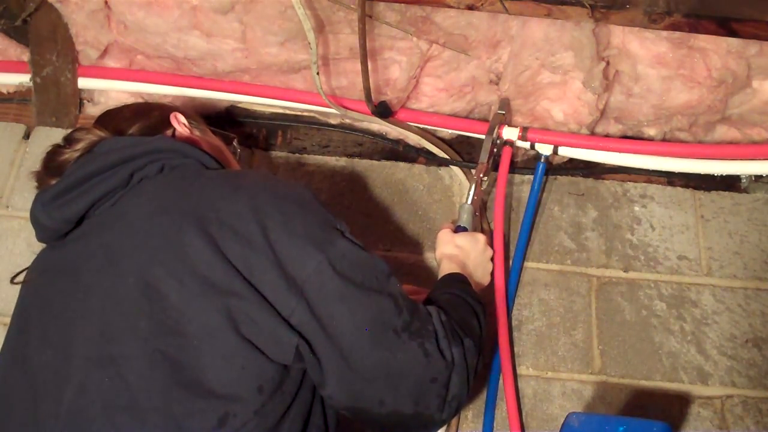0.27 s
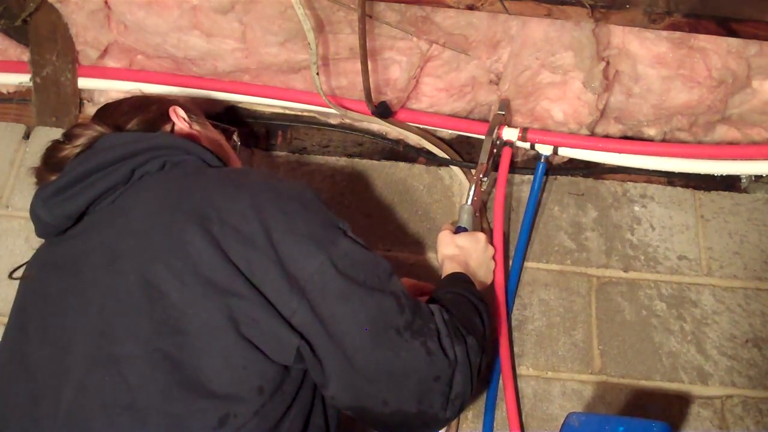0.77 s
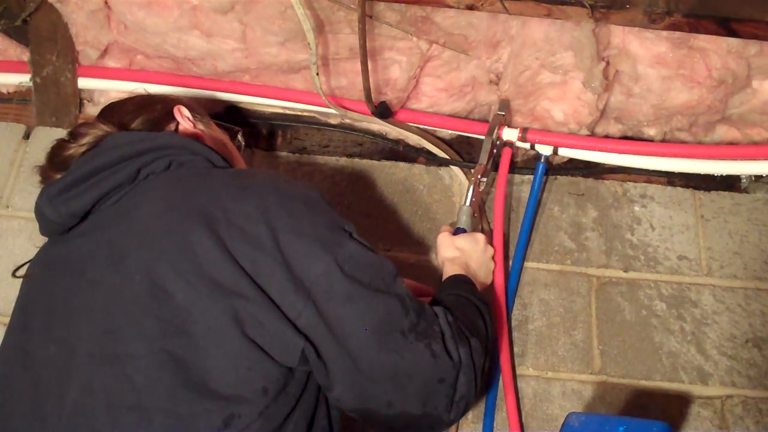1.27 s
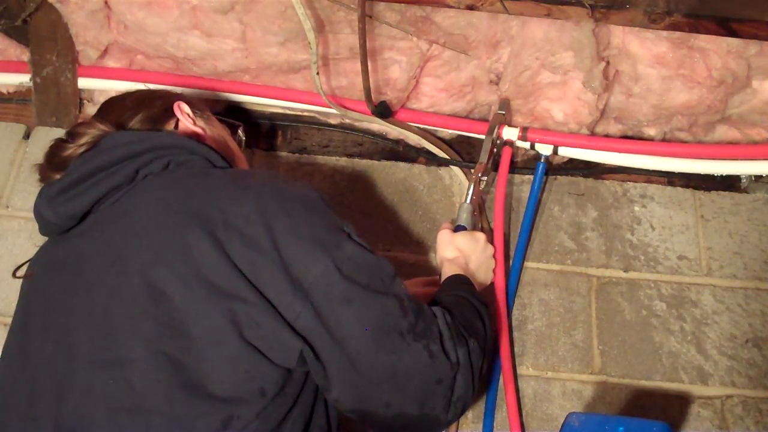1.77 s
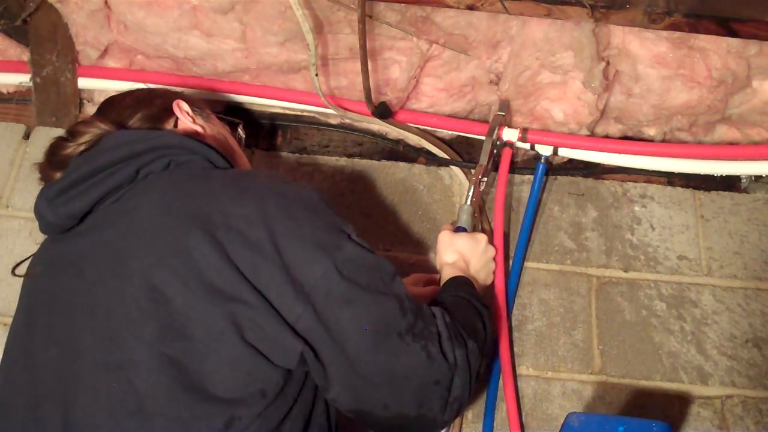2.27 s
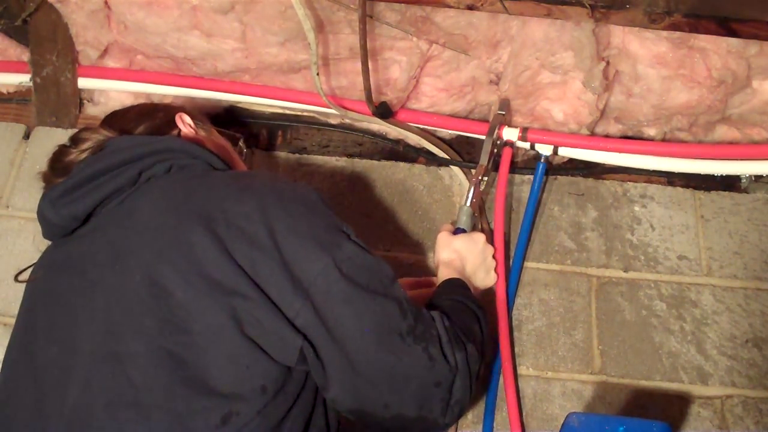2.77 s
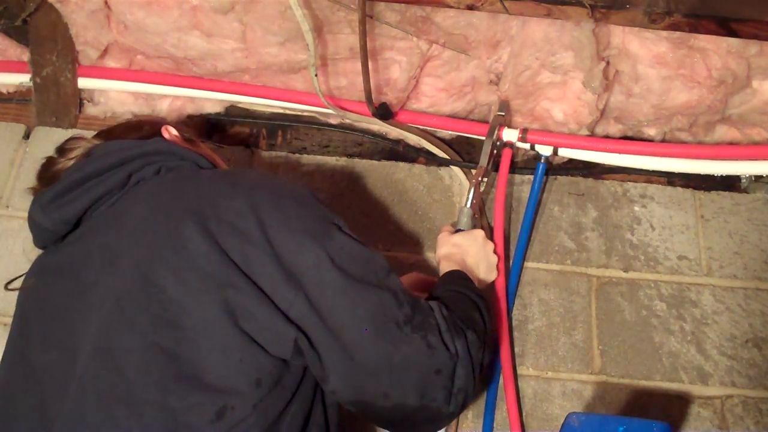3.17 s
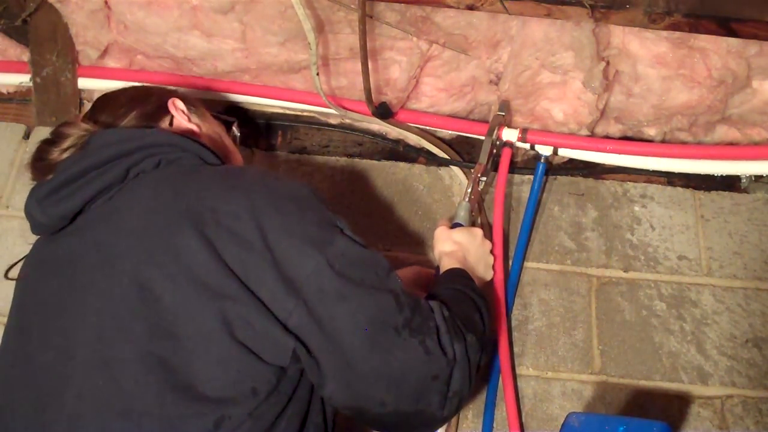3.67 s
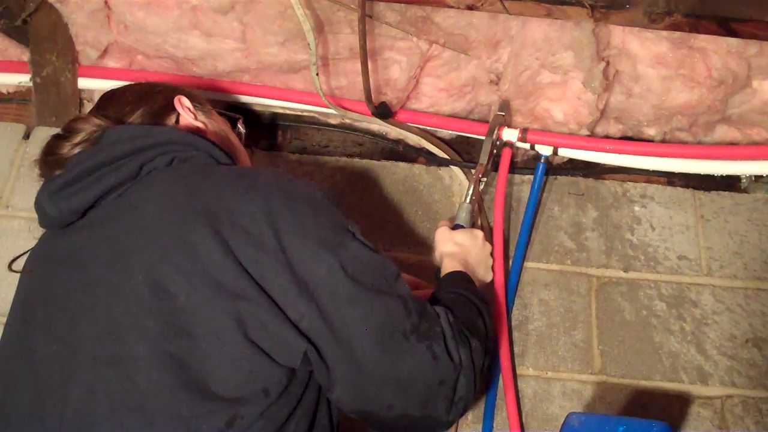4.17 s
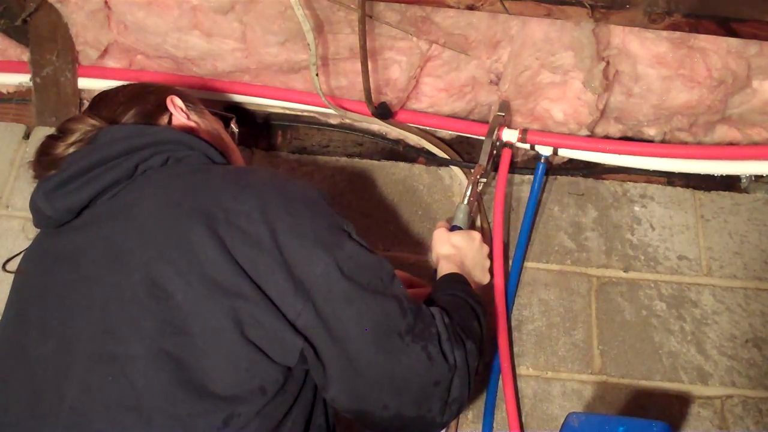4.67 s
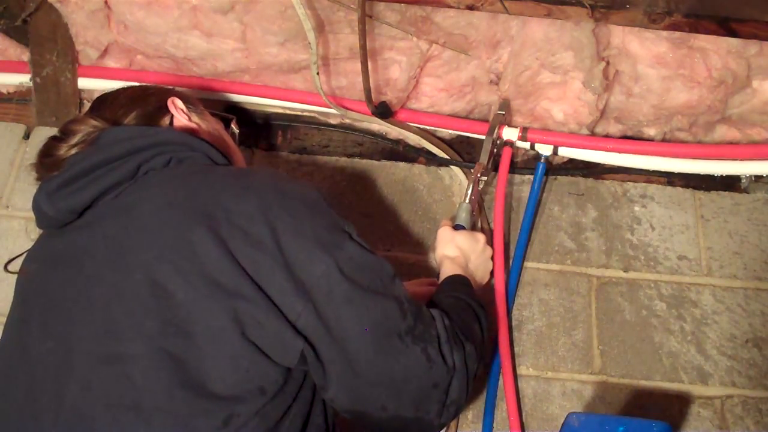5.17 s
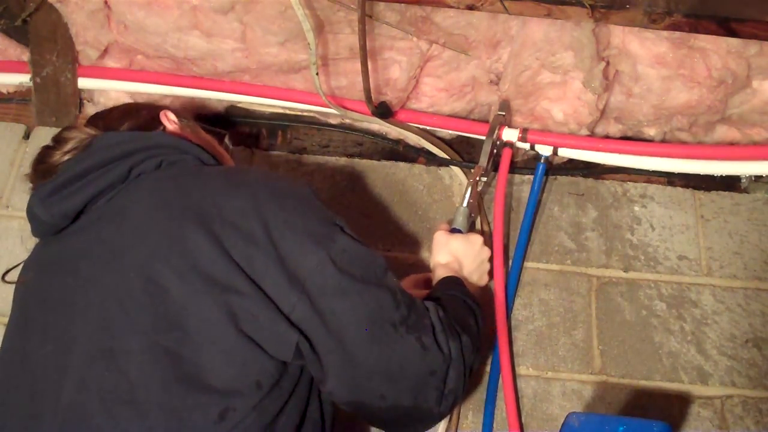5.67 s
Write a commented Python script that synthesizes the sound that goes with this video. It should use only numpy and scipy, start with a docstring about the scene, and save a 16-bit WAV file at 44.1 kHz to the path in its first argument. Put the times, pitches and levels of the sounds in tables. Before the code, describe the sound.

Residual water falls from a drained pipe onto hard plastic. At first there are only faint, irregular ticks and a barely audible fizzing trickle; clear high plinks follow. Four sharp, splashy smacks around 2.5, 3.6, 5.1 and 5.8 seconds overload the close microphone, adding a low thud and hum. Bubbles plop and gurgle softly between them in a tight block-walled space.

```python
"""Water drips from a drained pipe in a low basement, close to the microphone.
Heavy drops smack hard plastic: shaped noise bursts ring its modes, with a dull low thump as the microphone overloads.
Trapped bubbles plink as sines of rising pitch; small drops tick as bubble clusters with froth and spray.
Gurgles, a fizzing trickle and a faint hiss are filtered noise; joists and a block wall give a short, dense echo.
The smacks overload the microphone and knock its bias down."""
import sys
import numpy as np
from scipy import signal
from scipy.fft import rfft, irfft
from scipy.io import wavfile
from scipy.ndimage import uniform_filter1d

SR = 44100
rng = np.random.default_rng(int(sys.argv[2]) if len(sys.argv) > 2 else 0)


def pcm_store(signal):
    """Save signal as 16-bit PCM."""
    levels = np.round(np.clip(np.atleast_2d(signal), -1, 1) * 32767)
    wavfile.write(sys.argv[1], SR, levels.astype(np.int16).T)


N = 260631
EVENT_S = np.arange(SR // 5) / SR  # time axis of one short sound
EVENT_MS = EVENT_S * 1000


def undb(db):
    """Decibels to gain."""
    return 10 ** (np.asarray(db) / 20)


def add(track, start_s, sound):
    """Mix a sound into the track, cut off at the track's end."""
    start = int(start_s * SR)
    track[start:start + len(sound)] += sound[:N - start]


def unit(x):
    """Scale to rms 1."""
    return x / np.sqrt(np.mean(x ** 2))


def cut(x, hz, kind, order=2):
    """Butterworth low-pass or high-pass."""
    return signal.sosfilt(signal.butter(order, hz, kind, fs=SR, output="sos"), x)


def resonate(x, hz, width_hz):
    """One resonance, gain 1 at its centre."""
    return signal.lfilter(*signal.iirpeak(hz, hz / width_hz, fs=SR), x)


def noise(points, size):
    """Noise of rms 1 whose spectrum follows (hz, db) points, interpolated over log frequency."""
    hz, db = np.transpose(points)
    bins_hz = np.arange(size // 2 + 1) * SR / size
    gain = undb(np.interp(np.log(bins_hz + 1), np.log(hz), db))
    spectrum = rfft(rng.standard_normal(size)) * gain
    return unit(irfft(spectrum, size))


def burst(length_ms, steep, rise_ms=1.2):
    """Envelope with a short soft rise that falls away around length_ms, more abruptly if steep."""
    rise = np.minimum(EVENT_MS / rise_ms, 1)
    return rise * np.exp(-(EVENT_MS / length_ms) ** steep)


def smacks(thump_top_hz=720, crown_db=-8, crown_ms=7, spatter_db=-19, spatter_ms=24, shove=0.63, shove_ms=2.0):
    """Heavy drops burst on plastic, ring its modes and spatter; returns splashes and the overload thumps."""
    # heavy drops: start_s, level_db, splash_ms, splash_low_cut_hz, thump_to_splash_db, thump_low_cut_hz
    smack_events = [(2.528, -36, 6.1, 2000, -26, 250), (2.5323, -14.5, 12.7, 883, -11, 274),
                    (3.592, -33.5, 23, 920, -20, 250), (3.6102, -17, 7.5, 1110, -8.5, 230),
                    (5.118, -30.5, 6.7, 2430, -41, 250), (5.126, -21.5, 3.73, 4600, -21, 110),
                    (5.812, -36, 4.9, 2500, -24, 249), (5.818, -14.5, 12.3, 970, -8.5, 100)]
    # splash spectrum: freq_hz, level_db
    smack_colour = [(300, -7), (1100, -6), (1550, -2), (2400, -6), (4000, -7.5), (6000, -7), (9000, -6),
                    (12500, -11.5), (14500, -22)]
    # resonances of the struck plastic: freq_hz, width_hz, gain_db
    tub_modes = [(821, 120, -1), (1373, 50, -6), (1528, 180, -3.5), (1810, 68, -7.5), (2700, 260, -7),
                 (3920, 350, 9), (4520, 120, -12), (5717, 360, 4.5), (8230, 450, -16.5)]
    splashes, thumps = np.zeros(N), np.zeros(N)
    for start_s, level_db, splash_ms, splash_low_cut_hz, thump_db, thump_low_cut_hz in smack_events:
        push = burst(splash_ms, steep=2.9, rise_ms=0.62)
        size = undb(level_db) * np.sqrt(np.mean(push ** 2))
        crown = undb(crown_db) * burst(crown_ms, steep=0.76, rise_ms=2.2)  # the rim of water breaks up
        spatter = undb(spatter_db) * burst(spatter_ms, steep=1, rise_ms=10)  # and falls back as fine spray
        splash = noise(smack_colour, size=len(EVENT_S)) * (push + crown + spatter)
        ringing = sum(undb(gain_db) * resonate(splash, hz, width_hz) for hz, width_hz, gain_db in tub_modes)
        add(splashes, start_s, size * unit(cut(splash + ringing, splash_low_cut_hz, "high")))

        rumble = cut(rng.standard_normal(len(EVENT_S)) * push, thump_top_hz, "low", order=3)
        rumble = cut(rumble, thump_low_cut_hz, "high")
        sag = -burst(shove_ms, steep=1.0, rise_ms=8.0)  # one slow downward push of the overloaded microphone
        add(thumps, start_s, size * undb(thump_db) * (unit(rumble) + shove * unit(sag)))
    return splashes, thumps


def low_boom(thumps):
    """Low booming resonances that ring after the thumps."""
    # boom resonances: freq_hz, width_hz, gain_db
    boom_modes = [(224, 4.5, -13.5), (341.7, 36, -6), (559, 25, -14.5)]
    return sum(undb(gain_db) * resonate(thumps, hz, width_hz) for hz, width_hz, gain_db in boom_modes)


def bubbles():
    """Trapped bubbles plink, deeper ones fading more slowly; surfacing ones swoop up nearly an octave."""
    # trapped bubbles: start_s, level_db, start_pitch_hz, climb_octaves_per_s
    plinks = [(1.112, -58, 2720, 7.7), (1.163, -29.5, 4270, 8.6), (1.161, -45.5, 2430, 2.5),
              (1.213, -50, 2504, 2), (1.709, -52, 2110, 2), (1.864, -46.5, 2820, 3.3),
              (2.093, -27, 2657, 9.6), (2.095, -25.5, 4364, 2.2), (2.212, -41.5, 4220, 2.4),
              (3.509, -41.5, 2295, 2.2), (3.637, -29.5, 1339, 5.4), (3.924, -45.5, 997, 4.5),
              (4.22, -47, 1153, 3.8), (4.549, -55, 1573, 2), (4.738, -36.5, 1040, 6),
              (4.868, -54.5, 3050, 2), (5.28, -51.5, 685, 7.9), (5.568, -48.5, 1720, 2.2),
              (5.696, -43, 780, 5.3), (5.77, -44, 748, 0.75)]
    # surfacing bubbles: start_s, level_db, start_pitch_hz, octave_climb_ms
    swoops = [(2.271, -59, 930, 34), (2.809, -38.5, 1026, 11), (3.032, -59, 859, 39),
              (5.305, -45.5, 964, 35), (5.726, -44, 990, 22.6)]
    fade_1khz_ms, fade_slope = 13.7, 0.75
    swell_share = 0.28  # build-up / fade
    swoop_peak_share, swoop_fade_ms = 0.56, 7.6  # build-up / octave climb time
    out = np.zeros(N)
    for start_s, level_db, hz, octaves_per_s in plinks:
        fade_ms = fade_1khz_ms / (hz / 1000) ** fade_slope
        add(out, start_s, undb(level_db) * bubble(hz, octaves_per_s, swell_share * fade_ms, fade_ms))
    for start_s, level_db, hz, climb_ms in swoops:
        swoop = bubble(hz, 1000 / climb_ms, swoop_peak_share * climb_ms, swoop_fade_ms)
        add(out, start_s, undb(level_db) * swoop)
    return out


def bubble(hz, octaves_per_s, swell_ms, fade_ms, most_octaves=0.95, wobble_top_hz=200, wobble_rms=0.2):
    """A sine climbs in pitch as the bubble nears the surface; the stirred water makes its level waver."""
    pitch_hz = hz * 2 ** np.minimum(octaves_per_s * EVENT_S, most_octaves)
    swell = np.minimum(EVENT_MS / swell_ms, 1)
    fade = np.exp(-np.maximum(EVENT_MS - swell_ms, 0) / fade_ms)
    wobble = 1 + wobble_rms * unit(cut(rng.standard_normal(len(EVENT_S)), wobble_top_hz, "low"))
    return swell * fade * wobble * np.sin(2 * np.pi * np.cumsum(pitch_hz) / SR)


def drops():
    """Small drops that stand out; the more of a drop goes into spray, the longer the spray lasts."""
    # small drops: start_s, level_db, ring_pitch_hz, spray_to_ring_db
    drop_events = [(0.085, -64.5, 7970, 9), (0.174, -63.5, 7470, -12), (0.249, -71, 7660, 8),
                   (0.312, -67, 7840, 1), (0.34, -69, 10250, -4), (0.377, -59.5, 9040, -12),
                   (0.556, -72, 9660, -23), (0.599, -70.5, 10200, -25), (0.6944, -61, 9640, -6),
                   (0.8408, -62, 5530, -14), (0.909, -67, 6470, 2), (0.988, -67, 3850, -18),
                   (1.0908, -69.5, 8730, -11), (1.139, -66, 8000, 1), (1.1635, -54, 4310, -5.5),
                   (1.2065, -56.5, 7860, -11), (1.297, -70.5, 10760, 0), (1.332, -66, 3280, 4),
                   (1.377, -70, 6330, -2), (1.485, -66, 6700, -1), (1.574, -65.5, 3170, 4),
                   (1.67, -64.5, 2870, 0), (1.7867, -63.5, 3220, 0), (1.8243, -65.5, 11600, -2),
                   (1.863, -61, 2970, -5.5), (2.093, -45, 3315, -8), (2.161, -66.5, 9960, 3),
                   (2.2151, -59, 2430, -12), (2.3363, -68, 5630, 5), (2.795, -65.5, 3540, -4.5),
                   (2.833, -63.5, 5000, 19), (2.899, -70.5, 3400, -1), (2.9653, -63.5, 6100, -5),
                   (3.0625, -59.5, 4780, 24), (3.087, -67, 3100, 0.5), (3.194, -62.5, 4940, -12),
                   (3.273, -66.5, 10600, -14), (3.333, -65.5, 3980, -16), (3.579, -54.5, 3100, -4),
                   (3.714, -59.5, 4270, 3), (3.81, -63.5, 4240, 2), (4.0834, -69.5, 3000, 2.5),
                   (4.21, -69, 5150, 1), (4.221, -66, 2710, -5), (4.29, -69, 5170, -4),
                   (4.393, -68.5, 3680, 3.5), (4.526, -67, 7440, -4), (4.608, -60, 4220, -9),
                   (4.651, -61.5, 7480, -2), (4.673, -64.5, 4800, -6), (4.781, -56.5, 7400, -9.5),
                   (4.807, -60, 6570, 3), (5.092, -58.5, 3740, 5), (5.393, -69, 9100, -1.5),
                   (5.5489, -64.5, 3570, 4.5), (5.697, -65, 8260, 12), (5.7606, -63, 8700, 7)]
    even_spray_ms, doubling_db = 2.6, 16.5  # length at 0 dB spray; dB that double it
    out = np.zeros(N)
    for start_s, level_db, hz, spray_db in drop_events:
        spray_ms = even_spray_ms * 2 ** (spray_db / doubling_db)
        add(out, start_s, undb(level_db) * drop(hz, spray_db, spray_ms))
    return out


def drop(hz, spray_db, spray_ms, ring_ms=2.2, scatter=0.14, stagger_ms=1.3, rise_ms=1.6, froth_db=-1,
         froth_width=0.45, froth_ms=4.3, climb_octaves_per_s=6, count=4):
    """A cluster of tiny bubbles of nearly one size, a froth of still more around their pitch, a broad spray."""
    # spray spectrum: freq_hz, level_db
    spray_colour = [(200, -16.5), (900, -15.5), (2000, -4.5), (4000, 0), (7000, 0.5), (10000, -3.5),
                    (14000, -8.5)]
    ring = np.zeros(len(EVENT_S))
    for k, (detune, turn) in enumerate(rng.uniform(-1, 1, (count, 2))):
        start_hz = min(hz * np.exp(scatter * np.sqrt(k) * detune), SR / 3)
        pitch_hz = start_hz * 2 ** np.minimum(climb_octaves_per_s * EVENT_S, 0.5)
        tone = np.sin(2 * np.pi * np.cumsum(pitch_hz) / SR + np.pi * turn)
        tone = tone * burst(ring_ms, steep=0.81, rise_ms=rise_ms)
        ring += np.roll(tone, int(k * stagger_ms * SR / 1000)) / np.sqrt(1 + k)  # each later and weaker
    froth = churn(hz, froth_width) * burst(froth_ms, steep=0.65, rise_ms=rise_ms)
    spray = cut(noise(spray_colour, size=len(EVENT_S)), hz / 3, "high", order=1)
    spray = spray * burst(spray_ms, steep=0.85, rise_ms=1.6)
    body = unit(unit(ring) + undb(froth_db) * unit(froth))
    return unit(body + undb(spray_db) * unit(spray))


def droplets(count=70, floor_db=-83, spread_db=13, rarity=1.5, low_hz=4300, octaves=1.4, spray_db=-5, spray_ms=5.5):
    """Faint droplets keep landing at uneven gaps; the louder ones are rarer."""
    out = np.zeros(N)
    for k, (when, size, pitch) in enumerate(rng.random((count, 3))):
        start_s = (k + when) / count * N / SR
        level_db = floor_db + spread_db * size ** rarity
        add(out, start_s, undb(level_db) * drop(low_hz * 2 ** (octaves * pitch), spray_db, spray_ms))
    return out


def gurgles(width=1.0):
    """Water gurgles in the pipe: short, hollow churning of water and air."""
    # gurgles: start_s, level_db, pitch_hz, length_ms
    gurgle_events = [(1.323, -64, 364, 16), (2.813, -44, 1410, 4.7), (2.881, -53.5, 1690, 14.5),
                     (3.262, -63, 880, 14), (3.595, -33.5, 1210, 6.4), (3.636, -34, 1365, 17.6),
                     (4.364, -60, 764, 7.5), (4.61, -69, 556, 46), (5.512, -58, 984, 13.5),
                     (5.696, -58.5, 1200, 24)]
    out = np.zeros(N)
    for start_s, level_db, hz, length_ms in gurgle_events:
        gurgle = churn(hz, width) * burst(length_ms, steep=3.4, rise_ms=1.9)
        add(out, start_s, undb(level_db) * gurgle)
    return out


def churn(hz, width):
    """Many unresolved bubbles as noise resonating around one pitch; width is a share of that pitch."""
    width_hz = hz * width
    once = resonate(rng.standard_normal(len(EVENT_S)), hz, width_hz)
    return unit(resonate(once, hz, width_hz))


def trickle(level_db=-81, flicker_db=6.0, step_s=0.03, width=0.86):
    """A thin film of water fizzes along the pipe; each register comes and goes, partly together."""
    t = np.arange(N) / SR
    steps_s = np.arange(600) * step_s
    shared, out = rng.standard_normal(len(steps_s)), np.zeros(N)
    for hz in (3230, 4800, 6750, 9200, 11700):
        own = rng.standard_normal(len(steps_s))
        flicker = np.interp(t, steps_s, (shared + own) / np.sqrt(2))
        fizz = resonate(resonate(rng.standard_normal(N), hz, hz * width), hz, hz * width)
        out += undb(level_db + flicker_db * flicker) * unit(fizz)
    return out


def hiss(level_db=-63.5):
    """Steady background noise, strongest in the lowest bass."""
    # hiss spectrum: freq_hz, level_db (relative)
    hiss_colour = [(12, 7), (20, -6), (30, -12.5), (48, -12), (162, -17), (489, -18), (974, -19),
                   (1280, -23), (1430, -20.5), (7080, -32.5), (8130, -34.5), (13300, -38.5), (14500, -56)]
    return undb(level_db) * noise(hiss_colour, size=N)


def basement(x, near_db, near_t60_s, far_db, far_t60_s):
    """Dense reflections from the joists and wall, then the tail of the room, as decaying noise echoes."""
    # echo spectrum: freq_hz, level_db
    echo_colour = [(100, 9.5), (500, 10.5), (1500, 0), (4000, -4.5), (8000, -3.5), (14000, -6.5)]
    t = np.arange(SR // 2) / SR
    out = x
    for level_db, t60_s, gap_s in ((near_db, near_t60_s, 0.0012), (far_db, far_t60_s, 0.007)):
        decay = np.exp(-np.log(1000) * t / t60_s)
        echo = noise(echo_colour, size=len(t)) * decay * (t > gap_s)
        out = out + undb(level_db) * signal.fftconvolve(x, echo / np.linalg.norm(echo))[:N]
    return out


def scene():
    """All the drips in the room, over its hiss; the microphone's thumps and the low boom after them have no
    echo."""
    splashes, thumps = smacks()
    heavy = basement(splashes, near_db=-9.0, near_t60_s=0.047, far_db=-13.5, far_t60_s=0.23)
    plinks = basement(bubbles(), near_db=-11.0, near_t60_s=0.044, far_db=-18, far_t60_s=0.21)
    small = basement(drops() + droplets() + gurgles(), near_db=-5, near_t60_s=0.091, far_db=-19.5, far_t60_s=0.53)
    return (heavy + thumps + low_boom(thumps) + plinks + small + trickle() + hiss())[None]


def bias_shift(x, edge_hz=8000, threshold=0.019, depth=0.83, drain_per_s=0.19, coupling_hz=2.5, step_hz=118,
               soften_hz=400):
    """Sharp peaks knock the microphone's bias down; it creeps back in small humming steps and overshoots."""
    power = uniform_filter1d(cut(x, edge_hz, "high") ** 2, size=260, origin=129)  # window over the past
    edge = np.sqrt(np.abs(power))
    drained = drain_per_s * np.floor(step_hz * np.arange(N) / SR) / step_hz
    # peak hold that drains in steps
    charge = np.maximum.accumulate(depth * np.maximum(edge - threshold, 0) + drained) - drained
    softened = cut(charge, soften_hz, "low", order=1)
    return -cut(softened, coupling_hz, "high", order=1)


def record(dry, ceiling=0.98, top_hz=14100):
    """The microphone overloads on the smacks, its bias shifts and the top is cut."""
    x = ceiling * np.tanh(dry[0] / ceiling)
    top_cut = signal.ellip(10, 0.2, 70, top_hz, fs=SR, output="sos")
    return signal.sosfilt(top_cut, x + bias_shift(x))[None]


dry = scene()
out = record(dry)
pcm_store(out)
```